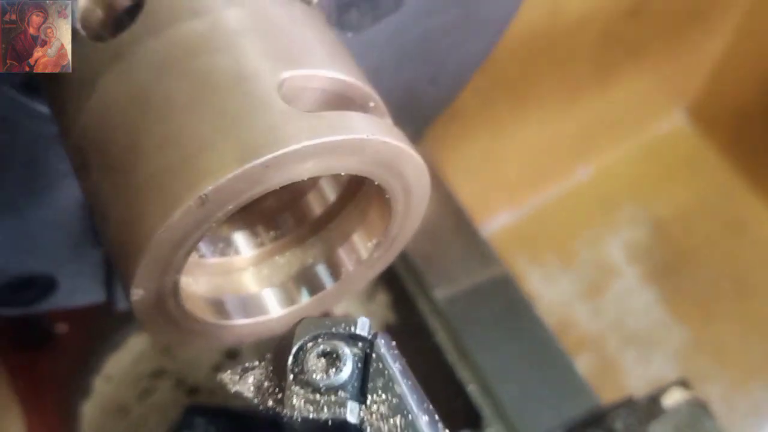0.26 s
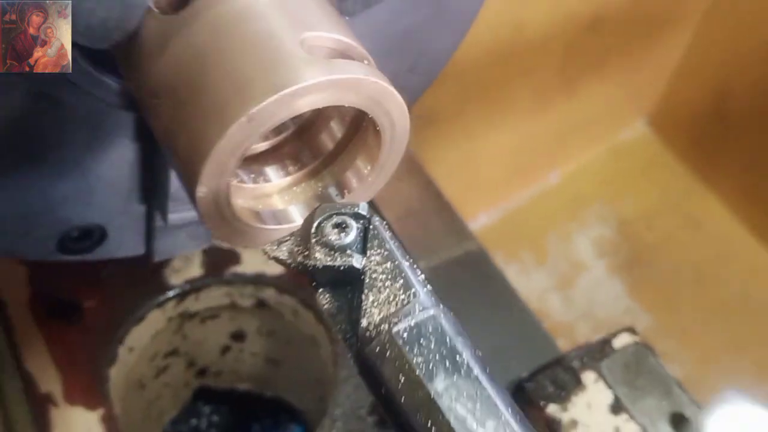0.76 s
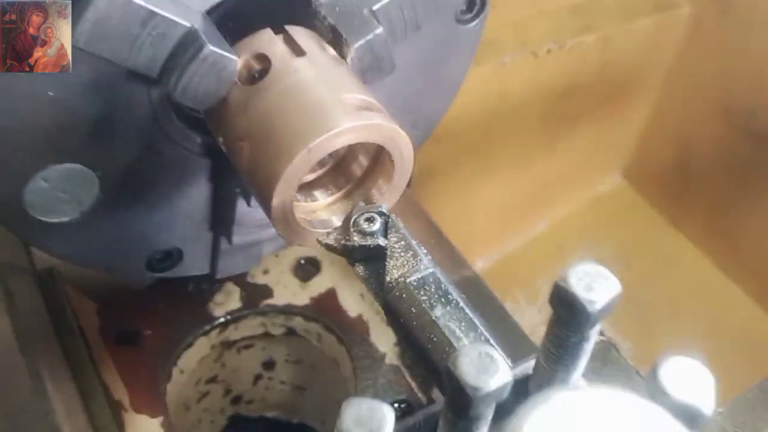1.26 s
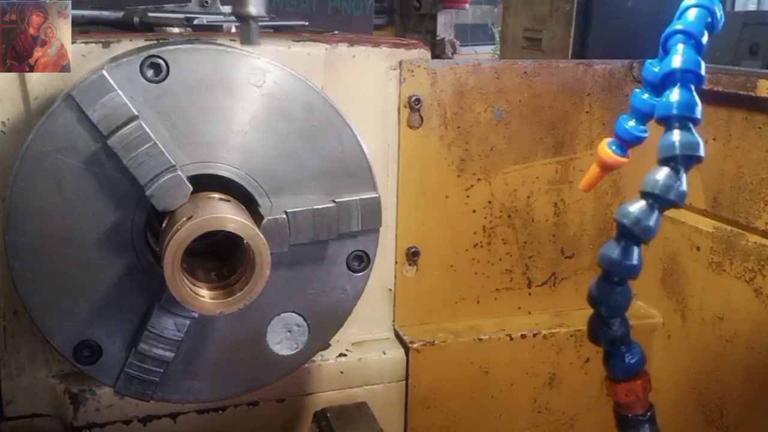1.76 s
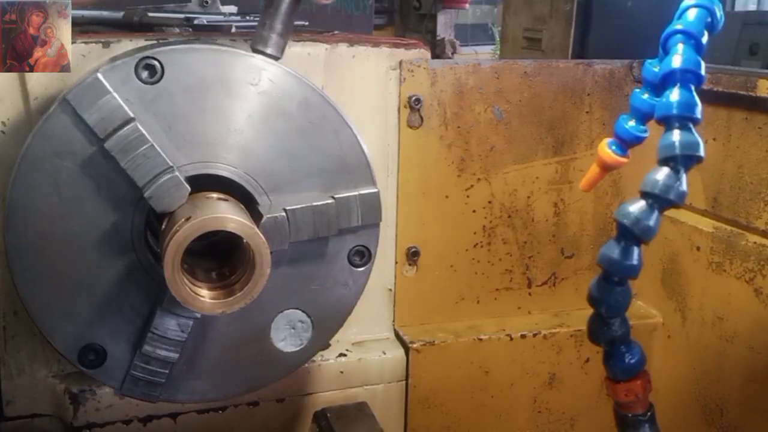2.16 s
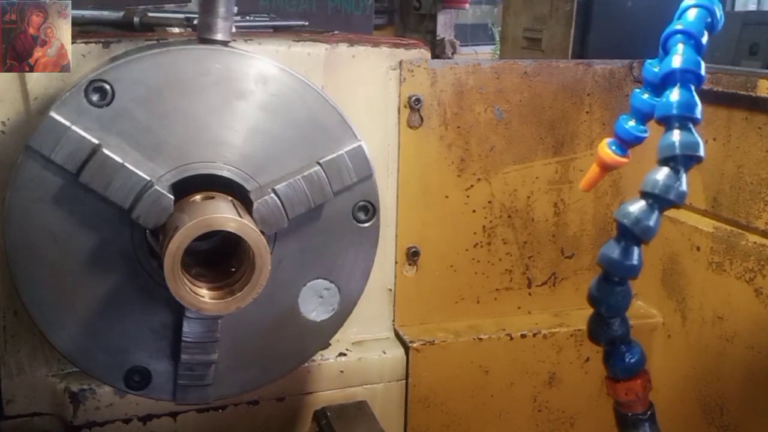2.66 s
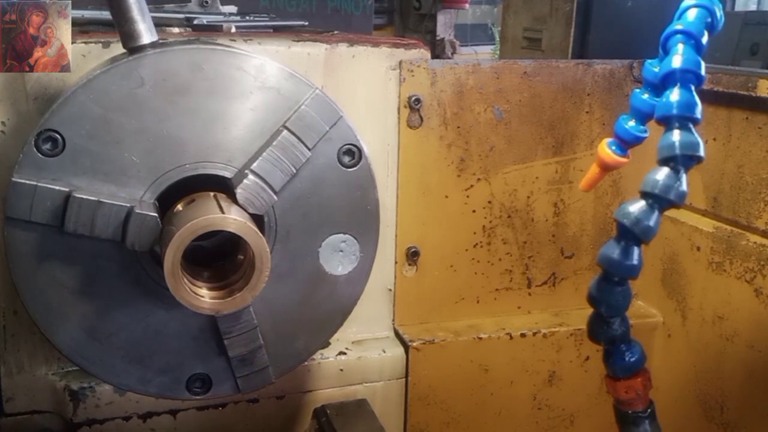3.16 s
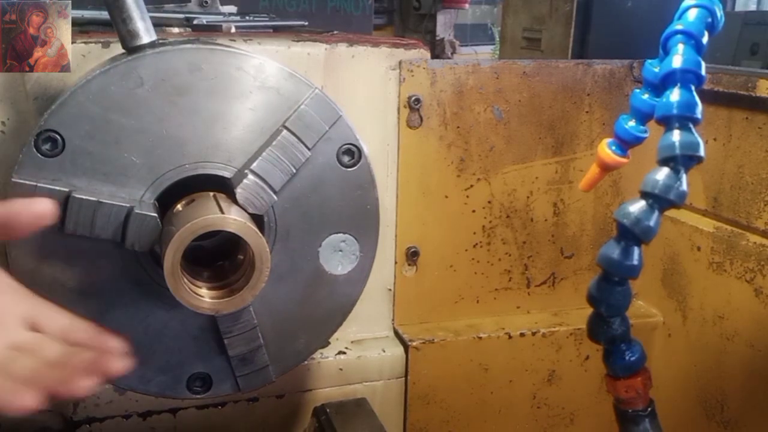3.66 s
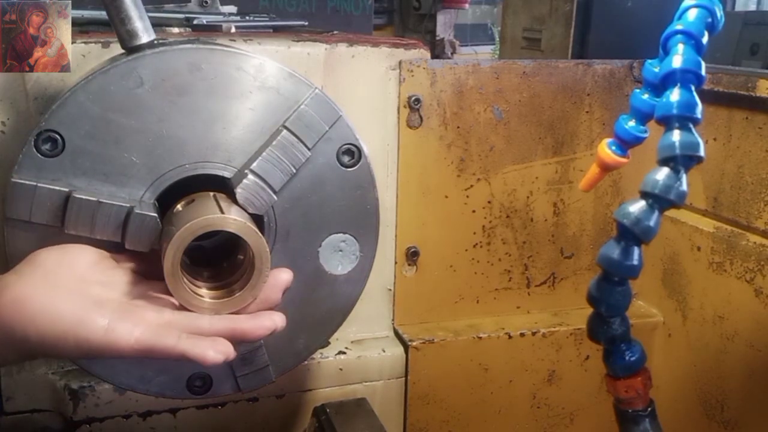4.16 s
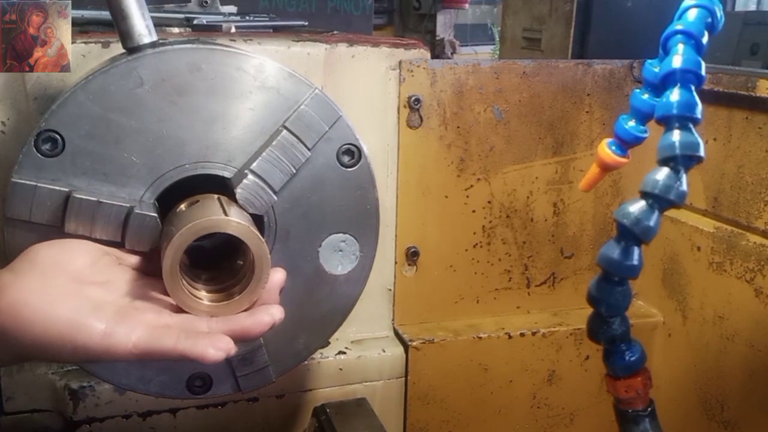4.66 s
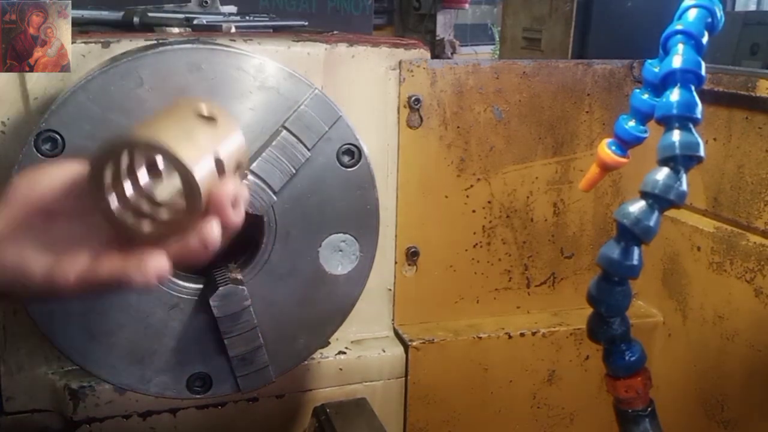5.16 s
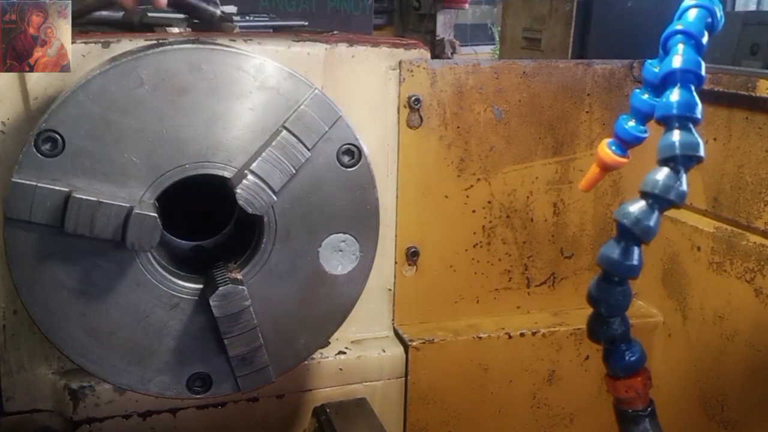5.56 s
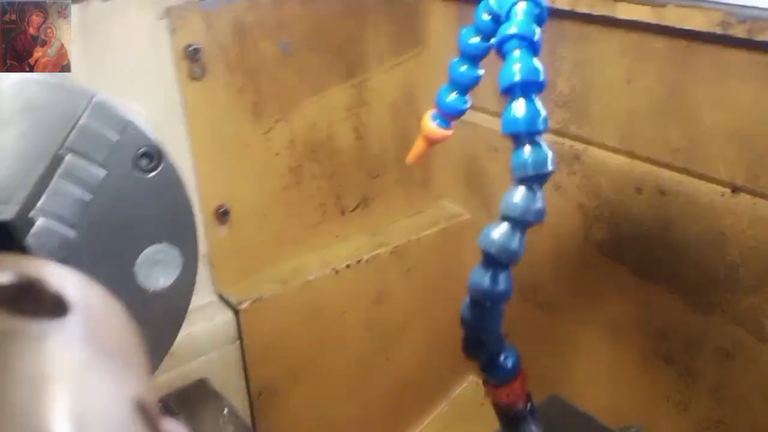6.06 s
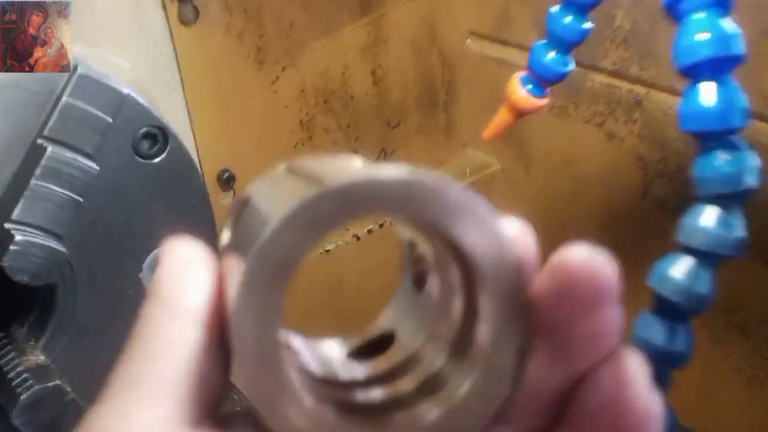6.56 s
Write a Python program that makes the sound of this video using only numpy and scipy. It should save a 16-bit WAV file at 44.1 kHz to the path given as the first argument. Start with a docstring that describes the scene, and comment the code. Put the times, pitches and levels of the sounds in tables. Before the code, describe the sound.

Sharp metal clanks and a ringing rattle in a workshop, with a brief machine drone and echoing bird calls outside.

```python
"""A chuck key in the workshop

A steel chuck key clanks into a stopped lathe and is later dropped on the headstock lid, where it rocks and
rings. Outside, a bird repeats a short rising note that the hard-walled shed smears into echoes, and once gives
a short falling one; other birds whistle and chirp further off, among faint low hoots. For the first 1.5 s a
machine drones too. The hand-held microphone rumbles and hisses throughout."""
import sys
import numpy as np
from scipy import signal
from scipy.fft import rfft, irfft, next_fast_len
from scipy.io import wavfile
from scipy.ndimage import uniform_filter1d

SR = 44100
rng = np.random.default_rng(int(sys.argv[2]) if len(sys.argv) > 2 else 0)


def generate_wav(sig):
    """Save sig (samples, or channels by samples) to the path in sys.argv[1] as 16-bit PCM at SR."""
    pcm = np.round(np.clip(np.atleast_2d(sig).T, -1, 1) * 32767).astype(np.int16)
    wavfile.write(sys.argv[1], SR, pcm)


N = 300309
MACHINE_END_S, CUTOFF_S = 1.502, 5.824  # at the cutoff, earlier ringing and echoes stop short


def gain_of(db):
    """Turns decibels into a number to multiply a sound by."""
    return 10 ** (np.asarray(db) / 20)


def evened(x):
    """Scales a signal so that its average strength (rms) is 1."""
    return x / np.sqrt(np.mean(x ** 2) + 1e-20)


def at_pitch(points, hz):
    """Looks up a pitch in a table, sliding smoothly between its rows."""
    table_hz, value = np.transpose(points)
    return np.interp(np.log(hz + 1), np.log(table_hz + 1), value)


def level(rows):
    """Joins (time_s, level_db) points into a gain for every sample."""
    return gain_of(np.interp(np.arange(N) / SR, *np.transpose(rows)))


def panned(left_db):
    """Left and right gains; left_db says how much louder the left side is."""
    pair = gain_of(np.array([[.5], [-.5]]) * left_db)
    return pair / np.sqrt(np.mean(pair ** 2, axis=0))


def add(mix, start_s, sound):
    """Mixes in a stereo sound at the given time."""
    part = mix[:, max(round(start_s * SR), 0):][:, :sound.shape[1]]
    part += sound[:, :part.shape[1]]


def until(end_s):
    """Full level, then a quick fade that finishes at end_s."""
    return np.clip((end_s - np.arange(N) / SR) / .004, 0, 1)


def drift(size, rate_hz):
    """A smooth random wiggle that changes about rate_hz times a second."""
    hz = np.fft.rfftfreq(next_fast_len(size + SR // 4), 1 / SR)
    real, imag = rng.standard_normal((2, len(hz)))
    return evened(irfft((real + 1j * imag) * np.exp(-(hz / rate_hz) ** 2)))[:size]


def flicker(depth_db, rate_hz, size=N):
    """A gain that wobbles at random: lumpy when slow, rough when fast."""
    return evened(gain_of(depth_db * drift(size, rate_hz)))


def patchy(x, depth_db):
    """Lets loudness wander in patches about 130 Hz wide and 90 ms long."""
    spectrum = signal.stft(x, nperseg=1024, noverlap=768)[2]
    patches = uniform_filter1d(rng.standard_normal(spectrum.shape[1:]), size=3, axis=0)
    patches = evened(uniform_filter1d(patches, size=16, axis=1))
    spectrum *= gain_of(depth_db * patches)
    return evened(signal.istft(spectrum, nperseg=1024, noverlap=768)[1][:, :N])


# How alike the two sides of a noise are: pitch_hz, likeness (0 to 1)
STEREO_LIKENESS = [(100, 0.94), (250, 0.89), (500, 0.38), (1000, 0.024)]

def noise(colour, size, tilt_db=0, sides=((1000, 0),)):
    """Stereo noise shaped by a colour (pitch_hz, level_db) and placed by sides (pitch_hz, left_db)."""
    hz = np.fft.rfftfreq(next_fast_len(size), 1 / SR)
    a, b, c, d = rng.standard_normal((4, len(hz)))
    likeness = np.clip(at_pitch(STEREO_LIKENESS, hz), -1, 1)
    left = a + 1j * b
    right = likeness * left + np.sqrt(1 - likeness ** 2) * (c + 1j * d)
    shape = gain_of(at_pitch(colour, hz) + tilt_db * np.log2(hz + 500)) * panned(at_pitch(sides, hz))
    return evened(irfft(np.array([left, right]) * shape, next_fast_len(size))[:, :size])


# How long the shed echoes: pitch_hz, fade_s (a fade time is the time to fall by 60 dB)
SHED_FADES = [(150, 0.66), (600, 0.48), (1600, 0.69), (2300, 0.7), (4500, 0.55), (8000, 0.5), (14000, 0.35)]

def shed(size=SR, stretch=1):
    """Hard walls blur a click into a tail of echoes; each pitch dies at its own speed."""
    hz, t, spectrum = signal.stft(rng.standard_normal((2, size)), SR, nperseg=256)
    fade_s = stretch * at_pitch(SHED_FADES, hz)[:, None]
    tail = signal.istft(spectrum * gain_of(-60 * t / fade_s), SR, nperseg=256)[1]
    return tail / np.linalg.norm(tail, axis=1, keepdims=True)


# The colours of the room's air and its low hum: pitch_hz, level_db
AIR_COLOUR = [(15, -21), (25, -3.5), (80, 3.5), (288, -3.5), (801, -5.5), (1160, -10), (2450, -13.5),
              (4480, -15.5), (5150, -35.5), (6500, -31), (8450, -63)]
HUM_COLOUR = [(25, -40.5), (50, 16.5), (68, 29.5), (90, 19.5), (130, -49.5)]
# The hum's slow rise and fall: time_s, level_db
HUM_CURVE = [(0, -68.5), (1.5, -52.5), (2.3, -60.5), (3.25, -54), (3.9, -70), (5.2, -69), (6.8, -53)]

def room_air(air_db=-63, hum_trim_db=-1):
    """A soft wash of air over a lumpy low hum."""
    hum = level(HUM_CURVE) * noise(HUM_COLOUR, N) * flicker(depth_db=4, rate_hz=6.7)
    return gain_of(air_db) * patchy(noise(AIR_COLOUR, N), depth_db=3.5) + gain_of(hum_trim_db) * hum


# The colours of the microphone's hiss and the faint fizz above it: pitch_hz, level_db
HISS_COLOUR = [(5000, -24), (6600, -19.5), (7200, -1.5), (7650, 7), (8300, -1), (9300, -7), (10500, -24.5),
               (15500, -81.5)]
FIZZ = [(3000, -25), (9000, -57), (10700, 0), (12500, 10.5), (15400, 9.5), (16000, 1)]

def microphone_hiss():
    """Hiss, mostly on the right, drops when the machine stops; then hiss and fizz both creep up."""
    since_s = np.arange(N) / SR - MACHINE_END_S
    hiss_db = np.where(since_s < 0, -51, -57.5 + 0.8 * since_s)
    fizz_db = np.where(since_s < 0, -76, -75 + 1.15 * since_s)
    hiss = noise(HISS_COLOUR, N, sides=[(5500, 4.1), (7500, -15), (9000, -15), (11000, 4.23)])
    return gain_of(hiss_db) * hiss + gain_of(fizz_db) * noise(FIZZ, N)


# The hand shifting on the microphone: start_s, length_s, level_db
HAND_SHIFTS = [(0.083, 0.28, -43.5), (0.757, 0.074, -50), (1.094, 0.063, -50), (1.367, 0.15, -40),
               (5.809, 0.5, -40), (6.346, 0.12, -45), (6.466, 0.18, -43), (6.644, 0.14, -42.5)]
# The colour of its rumble: pitch_hz, level_db
HAND_COLOUR = [(30, -60), (70, -40.5), (105, -2.5), (126, 8), (155, 6), (180, -9.5), (210, -5), (280, -22),
               (8000, -41.5), (12000, -63.5)]

def hand_rumble(rise_s=0.059, sag_db_per_s=26, release_s=0.015, rest_db=-85.5):
    """Each shift of the hand makes a rumble that swells quickly, sags and lets go."""
    loudness = np.full(N, gain_of(rest_db))
    for start_s, length_s, db in HAND_SHIFTS:
        age_s = np.maximum(np.arange(N) / SR - start_s, 0)
        release = np.exp(-np.maximum(age_s - length_s, 0) / release_s)
        loudness += np.minimum(age_s / rise_s, 1) * gain_of(db - sag_db_per_s * age_s) * release
    return loudness * noise(HAND_COLOUR, N)


# The colours of the machine's drone and its closing rasp: pitch_hz, level_db
DRONE_COLOUR = [(24, -68), (40, -7), (160, -3), (460, -14), (693, -10), (1450, -15), (2330, -10),
                (2760, -19.5), (3080, -11.5), (3990, -18.5), (4540, -7), (5060, -35), (5520, -23.5),
                (7000, -26.5), (9100, -79)]
RASP_COLOUR = [(400, -39), (1000, 4.5), (1500, 1), (2200, 5.5), (2700, -3), (3500, -27), (6000, -55)]
# How the rasp grows: time_s, level_db
RASP_CURVE = [(.8, -72), (1.05, -55.5), (1.24, -53), (1.31, -48.5), (1.5, -50.5)]
# The pitches at which the machine whines: pitch_hz, width_hz, relative_db
WHINE_BANDS = [(2000, 43, -7), (2270, 31, -3), (2560, 97, -7.5), (3030, 52, 3.5), (3380, 82, -11),
               (3777, 33, -2.5), (4400, 77, -1), (4582, 65, 4)]

def machine(swell_from_s=0.84):
    """A rough drone with wavering whines, off to the left; it swells, rasps and ends abruptly."""
    size = next_fast_len(N)
    hz, whine = np.fft.rfftfreq(size, 1 / SR), np.zeros((2, N))
    for pitch_hz, width_hz, db in WHINE_BANDS:
        peak = gain_of(db) * evened(1 / (1 + ((hz - pitch_hz) / width_hz * 2) ** 2))
        band = irfft(rfft(rng.standard_normal((2, size))) * peak, size)[:, :N]
        whine += band * flicker(depth_db=1, rate_hz=20)
    whine *= panned(7) * level([(swell_from_s, -61.5), (MACHINE_END_S, -58.5)])
    drone = noise(DRONE_COLOUR, N, sides=[(200, -0.5), (1500, 1), (4000, 71)])
    drone *= flicker(depth_db=2, rate_hz=70)
    rasp = noise(RASP_COLOUR, N, sides=[(1500, 19)]) * flicker(depth_db=3.5, rate_hz=73)
    drone = patchy(drone, depth_db=2.8) * level([(swell_from_s, -51.5), (MACHINE_END_S, -49.5)])
    return until(MACHINE_END_S) * (drone + level(RASP_CURVE) * rasp + whine)


def sliding_tones(rows, direct=0.091, bend=1.356, overtone_db=-42, rasp=.26, rasp_hz=238,
                  droop_hz=0, taper=0.19):
    """Each note is a sliding tone, raspier the further it slides, heard mostly as the shed's echoes."""
    out = np.zeros((2, N))
    for start_s, db, start_hz, end_hz, length_s, left_db, *echo_stretch in rows:
        progress = np.linspace(0, 1, int(np.clip(length_s * SR, 200, SR // 2)))
        pitch_hz = end_hz + (start_hz - end_hz) * (1 - progress) ** bend - droop_hz * progress ** 6
        slide = np.hypot(np.log(end_hz / start_hz), .1)  # even a level note wavers
        quaver = 1 + rasp * slide * drift(SR // 2, rasp_hz)[:len(progress)]
        phase = 2 * np.pi * np.cumsum(quaver * pitch_hz) / SR
        tone = np.sin(phase) + gain_of(overtone_db) * np.sin(2 * phase)
        tone *= signal.windows.tukey(len(tone), taper)
        path = shed(SR, *echo_stretch)
        path[:, 0] += direct  # the part that arrives without bouncing
        heard = signal.fftconvolve(tone[None], path, axes=1)
        heard /= np.sqrt(np.mean(heard[:, :SR // 7] ** 2, axis=1, keepdims=True))
        stop_s = MACHINE_END_S if start_s + length_s < MACHINE_END_S else CUTOFF_S
        if start_s < stop_s:
            heard *= until(stop_s - start_s)[:heard.shape[1]]
        add(out, start_s, gain_of(db) * panned(left_db) * heard)
    return out


# The near bird's notes: start_s, level_db, top_hz, echo_stretch (times the shed's fade), left_db
RISING_NOTES = [(0.236, -45.5, 1775, 2.3, 12), (0.995, -44, 1760, 3.4, 11), (1.891, -54, 1623, 0.88, -2),
                (2.301, -63.5, 1453, 0.39, -4), (2.531, -65, 1430, .4, 0), (2.755, -51.5, 1668, 1, -8),
                (3.256, -60.5, 1494, 0.23, 9), (4.047, -49, 1742, 0.99, -5), (4.52, -49, 1717, 0.92, -4),
                (4.808, -48.5, 1724, 1.14, -9.5), (5.053, -48.5, 1725, 1.36, -2),
                (5.304, -48, 1792, 2.5, 0.5), (5.827, -58.5, 1790, .9, 17), (6.08, -58, 1783, 1.6, 20),
                (6.51, -61.5, 1775, 1, 4)]
# Brief sharp peaks inside two of them: start_s, level_db
NOTE_PEAKS = [(4.089, -41), (4.553, -40.5)]

def near_bird(base_hz=1286.3, note_s=0.0789, wall_s=.06, wall_db=-9, peak_hz=1513, peak_s=0.0081):
    """A bird repeats a rising note, and a far wall throws it back from the other side."""
    notes = [(start_s, db, base_hz + 0.2 * (top_hz - base_hz), top_hz, note_s, left_db, stretch)
             for start_s, db, top_hz, stretch, left_db in RISING_NOTES]  # higher notes start higher
    out = sliding_tones(notes, direct=0.53, bend=1.365, overtone_db=-49.5, rasp=.17, rasp_hz=150,
                        droop_hz=207, taper=.42)
    add(out, wall_s, gain_of(wall_db) * out[::-1])
    t = np.arange(0, peak_s, 1 / SR)
    pip = np.sqrt(2) * np.sin(np.pi * t / peak_s) * np.sin(2 * np.pi * peak_hz * t)
    for start_s, db in NOTE_PEAKS:  # a brief sharp pip stands out inside the note
        add(out, start_s, gain_of(db) * panned(-2) * pip)
    return out


# Bird whistles, one falling note of the near bird and one metallic ring: start_s, level_db, start_hz, end_hz,
# length_s, left_db
THIN_TONES = [(0.381, -49, 4460, 4620, 0.082, 9), (0.589, -55, 5600, 5350, 0.29, -2.5),
              (1.132, -51, 5890, 5120, 0.036, 4), (1.294, -48, 5770, 7040, 0.067, -1),
              (1.494, -50.5, 6810, 6880, 0.044, -10), (2.829, -46, 2334, 2065, 0.036, 2),
              (2.971, -46, 2328, 1900, 0.035, 4), (3.597, -58, 1720, 1484, 0.041, -1),
              (4.267, -71, 5350, 5430, 0.456, 16.5), (5.85, -60.5, 6150, 5830, 0.065, 4),
              (6.033, -62, 3720, 3655, 0.095, 0), (6.052, -62, 5900, 5980, 0.066, 2)]

def whistles_and_ring():
    """Thin bird whistles slide up or down, the near bird gives one falling note at 3.6 s, and metal gives one
    brief high ring at 1.5 s."""
    return sliding_tones(THIN_TONES)


# The colours of steel hitting steel, at the chuck and on the lid: pitch_hz, level_db
CHUCK_CLATTER_COLOUR = [(200, -48), (1100, -29), (1700, -9), (2600, 2.5), (3850, 3), (4400, 10.5),
                        (5500, -4.5), (6500, 12), (8700, 16), (9700, 3.5), (10900, -11.5), (11900, 3.5),
                        (13600, -10), (14600, -7), (16000, -34)]
LID_CLATTER_COLOUR = [(40, -14), (300, -3), (1900, -5), (2750, 6), (3500, -4), (4400, 4), (5300, -8.5),
                      (6500, 17.5), (7400, 1), (8800, 12.5), (10600, -16), (11650, 2), (12400, -19),
                      (13700, -40), (14570, -20), (15100, -26), (16000, -40)]
# Which side the clatter comes from: pitch_hz, left_db
CLATTER_SIDES = [(1000, 3), (3000, 8.5), (7500, 11.5), (11500, -23)]

def clatter(t, chatter_s, tilt_db, on_lid, fade_s=0.017):
    """Steel chatters briefly on steel, then the noise dies fast; the lid cushions it."""
    rough_db, rise_s = (1.5, .0015) if on_lid else (3.5, .0005)
    colour = LID_CLATTER_COLOUR if on_lid else CHUCK_CLATTER_COLOUR
    jolts = flicker(rough_db, rate_hz=1300, size=len(t))
    loudness = gain_of(-60 * np.maximum(t - chatter_s, 0) / fade_s) * np.minimum(t / rise_s, 1)
    return jolts * loudness * noise(colour, len(t), tilt_db, CLATTER_SIDES)


# The steel key's natural tones: pitch_hz
KEY_PITCHES = [2715, 4374, 6455, 7225, 7985, 8745, 8863, 10400, 11599, 11970, 14548, 14593]
# How each tone rings, by where the key lands: lid_db, rim_db, socket_db, fade_s, left_db
KEY_TONES = [(-6, -4, -6, 0.1, -6), (-12, -3.5, -11, 0.66, 0.5), (-6, -10, -13, 0.52, -14),
             (-14.5, -28, 0, 0.12, -12), (-26, -5, -3, 0.22, -14), (-4, -5.5, -8.5, 0.46, -21),
             (-5, -11, 3, 0.12, -14), (-34, -25, -17, .15, -9), (0, 1, -4, 0.23, -0.5),
             (-9, -10, -1, 0.2, -2), (-0.5, -9, -15, 0.16, 2), (-11, -18, -0.5, 0.087, 5)]
SOCKET_FROM_S, LID_FROM_S = 1.8, 5  # the key hits the socket's rim, then the socket, then the lid

def key_ring(t, chatter_s, stretch, start_s, strength_db, flutter_hz=190, bloom=4.54, bloom_s=0.0088):
    """The key's tones flare up during the chatter, drop, then ring on, fluttering as it rocks."""
    out = np.zeros((2, len(t)))
    tilt_db_per_octave = 0.12 * min(strength_db + 22, 0)  # blows below -22 dB ring duller
    for hz, (lid_db, rim_db, socket_db, fade_s, left_db) in zip(KEY_PITCHES, KEY_TONES):
        wobble = rng.standard_normal((400, 2)) @ [1, 1j]
        rocking = 1 + .8 * np.interp(t * flutter_hz, np.arange(len(wobble)), wobble)
        pitch_hz = hz * (1 + .0015 * rng.standard_normal())  # each contact loads the key differently
        tone = rocking * np.exp(2j * np.pi * (pitch_hz * t + rng.random((2, 1))))
        db = lid_db if start_s > LID_FROM_S else rim_db if start_s < SOCKET_FROM_S else socket_db
        db += strength_db + tilt_db_per_octave * np.log2(hz / KEY_PITCHES[1])
        out += panned(left_db) * gain_of(db - 60 * t / (fade_s * stretch)) * tone.real
    return out * (1 - np.exp(-2 * t / chatter_s)) * (1 + bloom * np.exp(-t / bloom_s))


# The lathe's strongest low tones, struck at the chuck or on the lid: pitch_hz, level_db, fade_s
CHUCK_TONES = [(123, -8, 0.75), (156, -3.5, .22), (205, -2, 0.27), (250.3, -14.5, 0.89)]
LID_TONES = [(150, -12.5, 0.092), (236.6, -5, 0.083), (429, -1.5, 0.084), (489, -7, 0.2)]
# The colour of its many other tones in those two places: pitch_hz, level_db
CHUCK_COLOUR = [(60, -18), (130, 0), (255, 4.5), (400, -23.5), (600, -8), (2000, -54)]
LID_COLOUR = [(20, -48), (100, -12), (235, 8.5), (320, -7), (440, 6.5), (620, -6), (1400, -11), (2500, -32),
              (9000, -58)]

def lathe_thud(t, on_lid, wash_db=-4):
    """The heavy body answers with a low knock: long through the chuck, short and boxy on the lid."""
    tones, colour, wash_s = (LID_TONES, LID_COLOUR, .29) if on_lid else (CHUCK_TONES, CHUCK_COLOUR, .58)
    knock = sum(gain_of(db - 60 * t / fade_s) * np.cos(2 * np.pi * hz * t) for hz, db, fade_s in tones)
    wash = noise(colour, len(t)) * gain_of(wash_db - 60 * t / wash_s)
    return (knock + wash) * (1 - np.exp(-t / .0004))


# The key's hits and rubs: start_s, clatter_db, chatter_s, tilt_db (per octave), ring_db, thud_db, left_db
KEY_BLOWS = [(1.509, -50, 0.045, -7.5, -80, -51, -8.5), (1.7295, -15, 0.0035, -0.5, -24, -60, -9.5),
             (1.7323, -16.5, 0.0077, -3.5, -18.5, -82, -5), (1.874, -30.5, 0.011, -12.5, -63, -51.5, -8.5),
             (1.8857, -31, 0.0042, -13, -48, -58, -18), (1.891, -25, 0.015, -13.5, -36.5, -53, -8),
             (2.0031, -13.5, 0.0094, -7, -21, -44, -7), (2.01, -14.5, 0.0073, -3, -18.5, -30.5, -30),
             (2.7032, -37.5, 0.0012, 4, -76, -86, -15), (5.4605, -27, 0.0035, -4, -59, -42, -16),
             (5.491, -36, 0.025, -5.5, -48, -53, -8), (5.5, -24, 0.013, 0.5, -32, -49, -4),
             (5.565, -30, 0.015, -4, -25.5, -26.5, -6), (5.574, -30, 0.031, 4, -20.5, -36, -9),
             (5.614, -28, 0.033, -1.5, -30.5, -31, -11)]
# The key rocking on the lid: start_s, length_s, first_db
KEY_RATTLES = [(5.479, .08, -39), (5.597, 0.24, -34.5)]

def key_contacts(gap_s=.025, jitter_s=0.0016, fade_db_per_s=108):
    """Lists the main blows, then the fading, uneven taps of rocking; each ends with its ring stretch."""
    for start_s, *blow in KEY_BLOWS:
        yield start_s, *blow, 0.73 if start_s > LID_FROM_S else 0.093  # the chuck cuts the ring shorter
    chatter_s, tilt_db, left_db, stretch = 0.022, -4.5, -3, 2.3
    for start_s, length_s, first_db in KEY_RATTLES:
        for age_s in np.arange(0, length_s, gap_s):
            db = first_db - fade_db_per_s * age_s
            tap_s = start_s + age_s + jitter_s * rng.standard_normal()
            yield tap_s, db, chatter_s, tilt_db, db - 6.5, db - 9.5, left_db, stretch


def chuck_key(guard_db=-15, guard_delay_s=.009, guard_fade_s=0.11, seated_s=2.011):
    """Every blow clatters, rings and thuds; the sheet-metal guard slaps it back, then the shed."""
    out, t = np.zeros((2, N)), np.arange(SR // 2) / SR
    for start_s, clatter_db, chatter_s, tilt_db, ring_db, thud_db, left_db, stretch in key_contacts():
        on_lid = start_s > LID_FROM_S
        blow = gain_of(clatter_db) * clatter(t, chatter_s, tilt_db, on_lid) * panned(left_db)
        blow += key_ring(t, chatter_s, stretch, start_s, ring_db)
        blow += gain_of(thud_db) * lathe_thud(t, on_lid)
        slap = noise([(200, -1.5), (4000, -4), (9000, -12), (15000, -16)], len(t))
        slap *= (t > guard_delay_s) * gain_of(-60 * t / guard_fade_s)
        path = gain_of(-15 if on_lid else -19) * shed(len(t))[:, :len(t)]
        path += gain_of(guard_db) * slap / np.linalg.norm(slap[0])
        path[:, 0] += 1
        add(out, start_s, signal.fftconvolve(blow, path, axes=1))
    # Once seated in the socket, the key rings on faintly.
    add(out, seated_s, key_ring(t, chatter_s=0.0028, stretch=0.86, start_s=seated_s, strength_db=-43.5))
    return out * until(CUTOFF_S)


# A second bird's chirps: start_s, level_db, held_hz, left_db
FALLING_CHIRPS = [(2.44, -60, 3400, 5.5), (3.34, -56.5, 3660, 4.5), (3.602, -59, 3710, 4),
                  (3.811, -68, 3450, -1.5), (4.285, -64, 4550, 1), (4.868, -64.5, 3560, 9),
                  (4.957, -60.5, 4500, 4), (5.21, -68, 3770, 4), (5.769, -54.5, 3966, 6)]

def chirping_bird(start_hz=4800, end_hz=3505, chirp_s=0.048, held_after_s=0.032, held_s=0.084):
    """Each raspy chirp falls, then trails off on a quieter held tone."""
    chirps, held = [], []
    for start_s, db, held_hz, left_db in FALLING_CHIRPS:
        chirps.append((start_s, db, start_hz, end_hz, chirp_s, left_db))
        held.append((start_s + held_after_s, db - 10, held_hz, held_hz, held_s, left_db))
    return sliding_tones(chirps + held)


# Faint low hoots and hums: start_s, level_db, start_hz, end_hz, length_s
LOW_TONES = [(2.931, -59, 947, 733, 0.097), (3.055, -58, 931, 766, 0.074), (3.091, -62, 564, 419, 0.0756),
             (3.374, -53.5, 740, 610, 0.019), (3.428, -55, 999, 643, 0.035),
             (3.432, -51.5, 576.5, 482.5, 0.0446), (5.262, -54.5, 221.5, 260, 0.058),
             (5.34, -55, 502.5, 511, 0.072), (5.72, -50.5, 237, 238.6, 0.073)]

def hoots_and_hums(left_db=1):
    """Faint low far-off hoots, then soft hums of the lid as the key slides."""
    rows = [(*row, left_db) for row in LOW_TONES]
    return sliding_tones(rows, direct=0.47, bend=1, overtone_db=-15.5, rasp=.22, rasp_hz=95)


# The held key's small ping, and its tip touching the lid: pitch_hz, level_db, fade_s
PING_TONES = [(2410, -52, 0.021), (2720, -51, 0.025), (4360, -49, 0.045), (4480, -47.5, 0.039),
              (6560, -39, 0.022), (11650, -55, 0.046)]
TOUCH_TONES = [(1565, -32, 0.02), (9000, -29, 0.047), (10430, -26, 0.015)]

def key_ping(start_s, tones, hold_s, left_db=-9, rise_s=0.0015, room_db=-15):
    """The key, muffled by the hand, touches steel with one small ping."""
    out, t = np.zeros((2, N)), np.arange(SR // 4) / SR
    fading_s = np.maximum(t - hold_s, 0)
    ping = sum(gain_of(db - 60 * fading_s / fade_s) * np.sin(2 * np.pi * (hz * t + rng.random()))
               for hz, db, fade_s in tones)
    ping *= np.minimum(t / rise_s, 1)
    path = gain_of(room_db) * shed()
    path[:, 0] += 1
    add(out, start_s, panned(left_db) * signal.fftconvolve(ping[None], path, axes=1))
    return out


def scene():
    """Adds up all the sounds at the microphone."""
    tones = near_bird() + chirping_bird() + whistles_and_ring() + hoots_and_hums()
    key = chuck_key()
    key += key_ping(4.176, PING_TONES, hold_s=0.0045) + key_ping(5.461, TOUCH_TONES, hold_s=0.0026)
    return tones + key + machine() + room_air() + microphone_hiss() + hand_rumble()


def record(dry, ceiling=.8, top_hz=15900):
    """The recorder rounds off the sharpest peaks, then cuts the very highest treble."""
    rounded = ceiling * np.tanh(dry / ceiling)
    treble_cut = signal.firwin(511, top_hz, window=("kaiser", 9), fs=SR)
    return signal.oaconvolve(rounded, treble_cut[None], "same", axes=1)


dry = scene()
out = record(dry)
generate_wav(out)
```